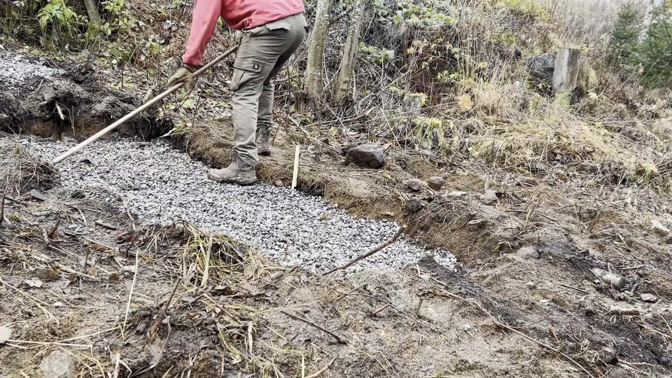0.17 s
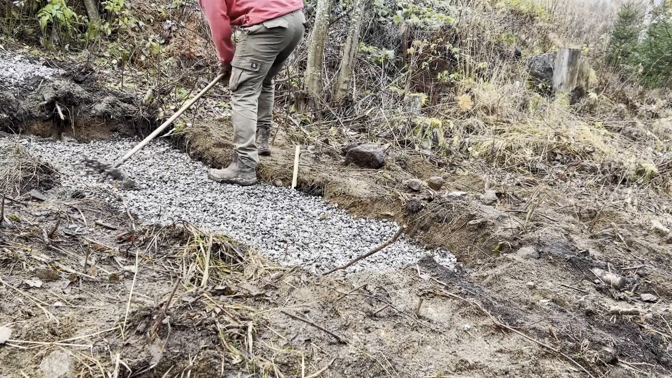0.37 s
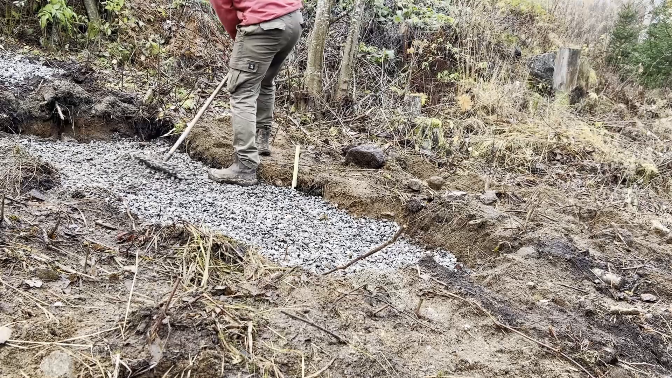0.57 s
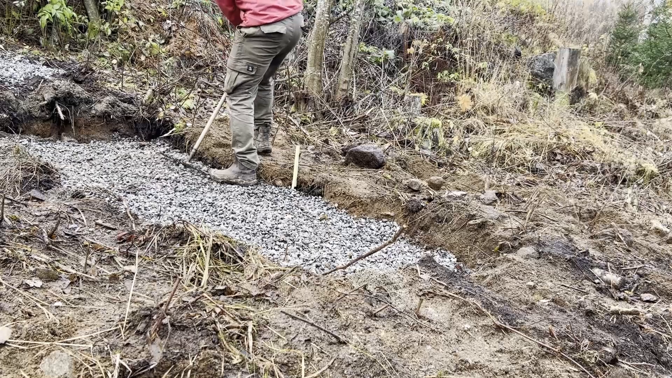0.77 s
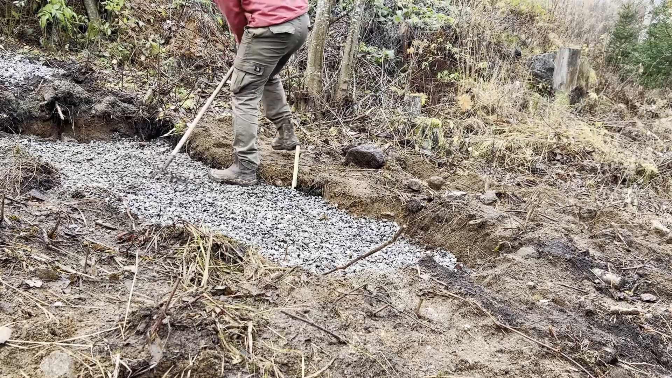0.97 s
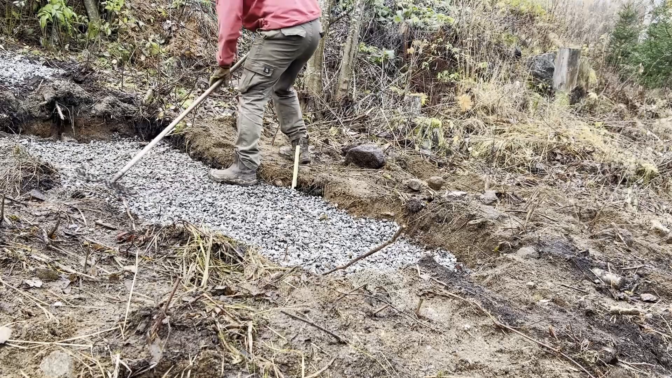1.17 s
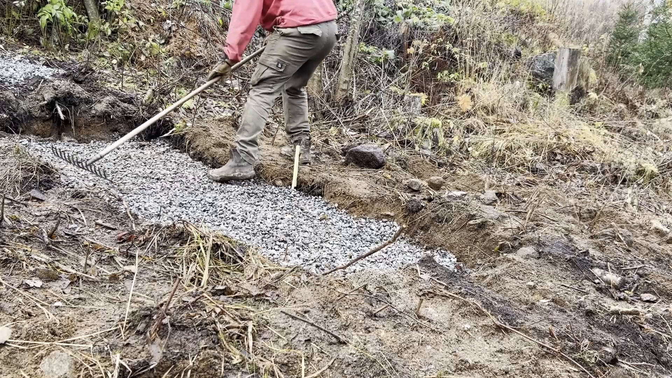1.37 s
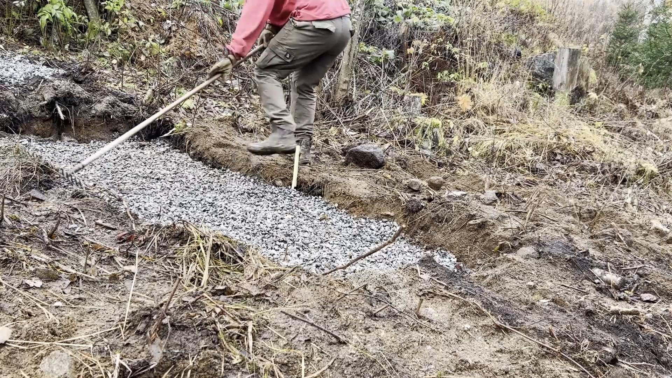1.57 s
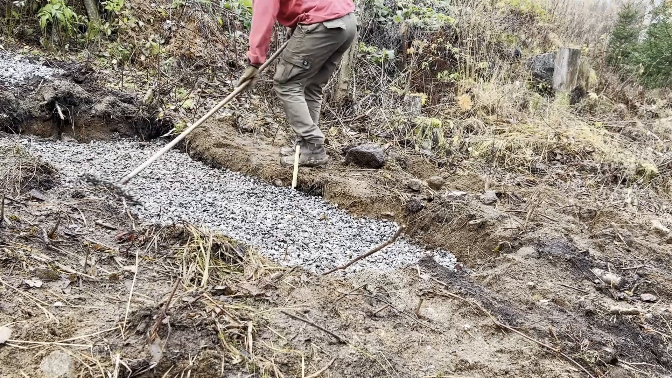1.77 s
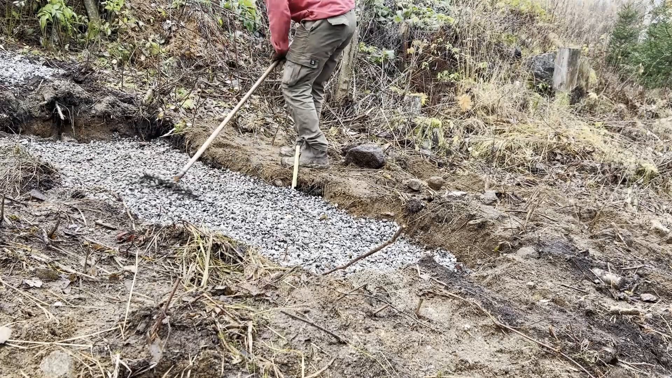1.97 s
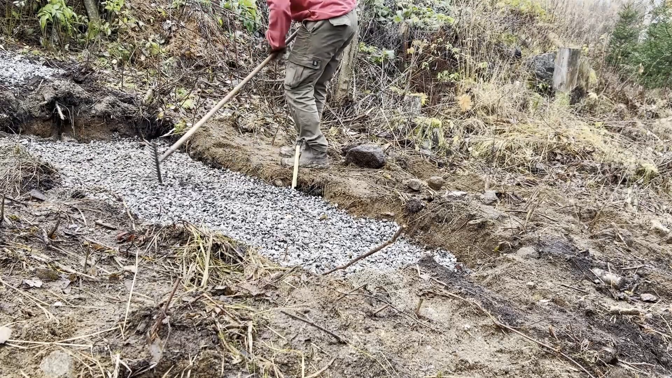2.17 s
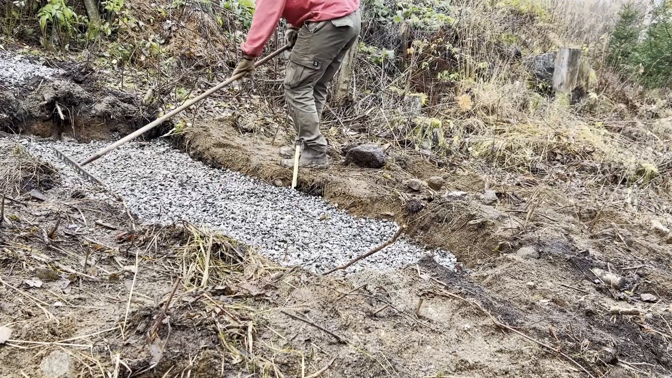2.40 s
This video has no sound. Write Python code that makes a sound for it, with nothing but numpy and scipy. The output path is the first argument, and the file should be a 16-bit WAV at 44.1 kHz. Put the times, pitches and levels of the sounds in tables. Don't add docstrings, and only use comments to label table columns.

```python
import sys
import numpy as np
from scipy import signal
from scipy.fft import rfft, irfft, next_fast_len
from scipy.io import wavfile
from scipy.ndimage import map_coordinates

SR = 44100
rng = np.random.default_rng(int(sys.argv[2]) if len(sys.argv) > 2 else 0)


def generate_wav(sig):
    pcm = np.round(np.clip(np.atleast_2d(sig).T, -1, 1) * 32767).astype(np.int16)
    wavfile.write(sys.argv[1], SR, pcm)


def natural_amplitude(level_db):
    exponent = np.asarray(level_db, float) / 20
    return 10 ** exponent


N = 108045

# (frequency [Hz], level [dB])
STONE_SPECTRUM = [(600, -18.5), (2000, -13.5), (4500, -9.5), (6200, -3), (8200, 2.5), (12000, -1),
                  (14500, 0.5), (15700, -2.5)]
# (frequency [Hz], bandwidth [Hz], level [dB])
TINE_MODES = [(1023, 72, 0), (1378, 94, -4.5), (1660.6, 28.4, 4.5), (1939, 167, 0.5), (2520, 71, 4.5),
              (2750, 12, 5), (2890, 38, 4.5), (3268, 41, 2.5), (3594, 89, 1), (4100, 155, -4),
              (5000, 530, -18), (2400, 1800, -12.5)]


def unit(x):
    return x / np.sqrt(np.mean(x ** 2) + 1e-20)


def along(points, hz):
    f, v = np.transpose(points)
    return np.interp(np.log(hz + 1), np.log(f + 1), v)


def curves(rows):
    s, *cols = np.transpose(rows)
    return [np.interp(np.arange(N) / SR, s, c) for c in cols]


def wobble(rate):
    return map_coordinates(rng.standard_normal(1000), [np.arange(N) * rate / SR])


def filtered(x, response):
    m = next_fast_len(N + SR // 2)
    return irfft(rfft(x, m) * response(np.fft.rfftfreq(m, 1 / SR)), m)[..., :N]


def coloured(x, spectrum):
    return unit(filtered(x, lambda hz: natural_amplitude(along(spectrum, hz))))


def resonance(f, centre, width, db):
    return natural_amplitude(db) * 1j * f * width / (centre * centre - f * f + 1j * f * width)


def bursts(events, rise_s, t60):
    out = np.zeros(N + SR)
    t = np.arange(SR // 4) / SR
    for s, db in events:
        out[round(s * SR):][:len(t)] += natural_amplitude(db - 60 * t / t60) * (1 - np.exp(-t / rise_s))
    return out[:N]


def scattered(grains):
    count, length = grains.shape
    at = (rng.random((count, 1)) * N).astype(int) + np.arange(length)
    return unit(np.bincount(at.ravel(), grains.ravel(), N + length)[:N])


def ports(x, alike):
    # (frequency [Hz], phase [rad])
    lead_points = [(0, 0), (1550, 1.05), (2350, 0), (4800, 0), (5400, 1.9), (6500, 2.15), (9600, 6.28),
                   (15800, 12.5)]
    # (frequency [Hz], level [dB])
    tilt_points = [(300, -1), (1000, 2), (1900, 4), (2500, -2), (4600, -3.5), (5000, 0), (5700, -5),
                   (7900, 0)]
    z = signal.stft(x, nperseg=128)[2]
    z = z * np.exp(2j * np.pi * rng.random(z.shape))
    other = np.sqrt(2) * signal.istft(z, nperseg=128)[1][:N]
    side = np.array([[1], [-1]])

    def turn(hz):
        return np.arccos(np.clip(along(alike, hz), 0, 1)) / 2

    def port(hz):
        lead = np.interp(hz, *np.transpose(lead_points))
        return natural_amplitude(side * along(tilt_points, hz) / 2) * np.exp(.5j * side * lead)

    first, second = (x, other) if x.ndim == 1 else x
    shared = filtered(first, lambda hz: port(hz) * np.cos(turn(hz)))
    diffuse = filtered(second, lambda hz: side * port(hz) * np.sin(turn(hz)))
    return shared + diffuse


def outdoor_air():
    # (frequency [Hz], level [dB])
    air_spectrum = [(18, -46.5), (30, -14.5), (382, -19), (596, -12.5), (698, -16.5), (883, -18),
                    (15800, -46.5)]
    return natural_amplitude(-67) * coloured(rng.standard_normal((2, N)), air_spectrum)


def ground():
    # (time [s], rumble level [dB], rustle over rumble [dB])
    load = [(0.0, -77, 7.5), (0.2, -56, 2), (0.25, -54, -9), (0.94, -65.5, 2), (1.14, -52.5, -7.5),
            (1.31, -71, 3), (1.62, -72.5, 2.5), (1.7, -51.5, -5), (1.83, -63, -4), (1.9, -49, -7.5),
            (2.09, -71, 0.5), (2.45, -68, -1.5)]
    # (frequency [Hz], level [dB])
    soil_spectrum = [(120, -19), (220, 4), (450, 2), (750, -3), (1200, -40), (2500, -48)]
    # (frequency [Hz], level [dB])
    rumble_spectrum = [(22, -50), (38, -17), (54, -1), (90, -8.5), (150, -11.5), (250, -34.5)]
    low_db, soil_db = curves(load)
    soil_lumps_db, low_lumps_db = 2 * wobble(30), 2 * wobble(18)
    soil = coloured(rng.standard_normal((2, N)), soil_spectrum)
    low = coloured(rng.standard_normal((2, N)), rumble_spectrum)
    return natural_amplitude(low_db + soil_db + 0.5 + soil_lumps_db) * soil + natural_amplitude(low_db - 1.0 + low_lumps_db) * low


def shower(count, spread_db, life_s):
    g = rng.random((count, 2))
    t = np.arange(160) / SR
    size_db = spread_db * np.minimum(-np.log(1 - g[:, :1]), 3)
    decay_s = life_s * (.3 + g[:, 1:])
    return scattered(natural_amplitude(size_db - 60 * t / decay_s) * rng.standard_normal((count, len(t))))


def clinks(count, middle_hz, octaves, life_s):
    g = rng.standard_normal((count, 3))
    t = np.arange(700) / SR
    hz = np.clip(middle_hz * 2 ** (octaves * g[:, :1]), 900, 15600)
    decay_s = life_s * np.exp(.4 * g[:, 2:])
    return scattered(natural_amplitude(2.5 * g[:, 1:2] - 60 * t / decay_s) * np.sin(2 * np.pi * hz * t))


def scraping(x):
    swap_db, buried = 3.5, 1.7
    centre, width, db = np.transpose(TINE_MODES)[..., None]
    width = np.where(width < 1000, buried * width, width)
    modes = filtered(x, lambda f: resonance(f, centre, width, db))
    touch_db = swap_db * np.array([wobble(26) for _ in TINE_MODES]) * (width < 1000)
    sign = (-1) ** np.arange(len(TINE_MODES))[:, None]
    return unit(np.sum(modes * natural_amplitude(touch_db) * sign, axis=0))


def gravel():
    # (time [s], stone shower level [dB], tine contact over the shower [dB])
    settle = [(0, -61.5, -28), (.06, -72.5, -3), (.07, -53.5, -8.5), (.176, -68, 2), (.185, -63, -15)]
    pull = [(.186, -59.5, 4), (0.199, -41.5, 5), (.222, -50.5, 3), (.28, -42, -5), (.44, -37, -11),
            (.6, -42, -11.5), (.74, -49, -14.5), (.88, -53, -3)]
    push = [(0.88, -56.5, -2), (0.903, -43, -12), (1.0, -35, -12.5), (1.045, -39.5, -5.5),
            (1.052, -41.5, -5), (1.06, -43.5, -1), (1.081, -49, -5)]
    rebound = [(1.085, -39, -10.5), (1.097, -31, -7), (1.126, -35.5, -8), (1.22, -46, -4.5),
               (1.28, -56.5, -3), (1.35, -54.5, -11.5), (1.561, -78.5, 4.5), (1.655, -95, -0.5)]
    second_pull = [(1.659, -92, -13.5), (1.666, -33, -3.5), (1.69, -48, 0), (1.77, -39, -5),
                   (1.88, -40, -10), (1.948, -39, -4.5), (2.06, -42.5, -18.5), (2.2, -51.5, -24),
                   (2.45, -81, 6)]
    # (time [s], swell [dB], half length [s])
    surges = [(0.279, 3.5, 0.0069), (0.295, 3, 0.0036), (.342, 4, 0.0061), (0.358, 1.5, .004),
              (0.373, 8, 0.0093), (0.434, 2.5, 0.0072), (0.445, 0.5, 0.0043), (0.45, 1, 0.0043),
              (.505, 2.5, 0.011), (0.521, 2.5, 0.0059), (0.549, 5, 0.0054), (0.668, 5.5, 0.0071),
              (0.947, 0, 0.0043), (1.137, -1.5, .005), (1.153, 1, .006), (1.18, 2.5, 0.0088),
              (1.224, 2.5, 0.007), (1.746, 2.5, 0.011), (1.808, -0.5, 0.0039), (1.864, 4, 0.013),
              (1.895, 1, 0.0072), (1.93, 3.5, 0.023), (1.956, 3, 0.012)]
    flow_db, dig_db = curves(np.vstack([settle, pull, push, rebound, second_pull]))
    t = np.arange(N) / SR
    jolt_db = .4 * wobble(34) + .7 * wobble(75)
    for s, db, half_s in surges:
        jolt_db = jolt_db + db * np.exp(-((t - s) / half_s) ** 2)

    cracks = shower(count=9000, spread_db=6.0, life_s=0.0011)
    hiss = natural_amplitude(3.5) * rng.standard_normal(N)
    grit = coloured(cracks + hiss, STONE_SPECTRUM)
    grit = grit + natural_amplitude(-12.5) * clinks(count=5000, middle_hz=10040, octaves=.45, life_s=0.011)
    sharp_db = 0.33 * (flow_db + 35)
    fine = filtered(grit, lambda hz: 1 / (1 + (12000 / (hz + 1)) ** 8))
    stones = natural_amplitude(flow_db + 6 + jolt_db) * (grit + (natural_amplitude(sharp_db) - 1) * fine)

    scrape = scraping(shower(count=4000, spread_db=2.0, life_s=0.0016))
    return stones + natural_amplitude(flow_db + dig_db - 1 + 0.66 * jolt_db) * scrape


def loose_stones():
    # (time [s], peak level
    # [dB])
    tick_times = [(.902, -30), (1.0478, -12), (1.0495, -16), (1.051, -19), (1.0535, -25), (1.0578, -26),
                  (1.0895, -19), (1.0925, -21), (1.1012, -14), (1.1032, -15), (1.1228, -20), (1.41, -48),
                  (1.444, -43), (1.53, -50), (.605, -27), (.714, -32), (2.0005, -27), (2.025, -27),
                  (2.0388, -22), (2.061, -27), (2.0855, -27), (2.1095, -23), (2.1165, -25), (2.132, -30),
                  (2.144, -30), (2.1595, -23), (2.167, -30), (2.176, -30), (2.188, -33), (2.22, -25),
                  (2.238, -42), (2.255, -38), (2.267, -40), (2.28, -42), (2.2905, -32), (2.30, -33),
                  (2.329, -46), (2.338, -44), (2.36, -44), (2.388, -54)]
    # (time [s], peak level [dB], frequency [Hz])
    knock_times = [(.069, -49.5, 484), (.131, -45, 420), (0.139, -48, 550), (.18, -50, 527),
                   (.186, -55, 263), (.382, -43, 310), (.44, -43.5, 255), (0.498, -45, 426),
                   (.551, -47.5, 428), (.659, -49.5, 592), (.717, -55, 425), (0.759, -39, 220),
                   (.777, -44, 480), (1.101, -37, 242), (1.112, -42.5, 634), (1.279, -43.5, 610),
                   (1.305, -53.5, 900), (1.319, -45, 600), (1.34, -53, 670), (1.36, -56, 650),
                   (1.372, -57, 670)]
    tick_spectrum = [(2500, -27), (5000, -14), (8000, 6), (14000, 1.5)]  # (Hz, dB)
    soft_spectrum = [(130, -8), (250, 0.5), (700, 2.5), (1200, -9.5), (2500, -19)]  # (Hz, dB)
    blow = np.sign(rng.standard_normal(N)) * bursts(tick_times, rise_s=.00005, t60=.004)
    ticks = filtered(blow, lambda hz: natural_amplitude(along(tick_spectrum, hz)))

    t = np.arange(N) / SR
    hollow = np.zeros(N)
    for s, db, hz in knock_times:
        hollow += bursts([(s, db)], rise_s=.001, t60=.028) * np.sin(2 * np.pi * hz * (t - s))
    soft = bursts([k[:2] for k in knock_times], rise_s=0.00066, t60=0.048)
    soft = soft * coloured(rng.standard_normal(N), soft_spectrum)
    return natural_amplitude(-1) * ticks + natural_amplitude(1) * (hollow + natural_amplitude(-4) * soft)


def pings():
    # (time [s], peak level [dB], frequency [Hz], t60 [s])
    struck = [(0.199, -30, 2950, 0.039), (.2, -30, 3227, 0.036), (.272, -41, 3540, 0.068),
              (.286, -41, 2500, 0.064), (.292, -43, 2850, 0.11), (.325, -45, 4650, .15),
              (.374, -34, 4630, .06), (.376, -49, 2505, .06), (.549, -49, 4540, 0.066),
              (0.654, -46.5, 3270, 0.1), (.955, -42, 2477, .08), (1.103, -38, 2520, 0.12),
              (1.108, -41, 1987, .15), (1.15, -38.5, 2540, 0.066), (1.17, -40, 2750, 0.1),
              (1.186, -47.5, 2050, 0.18), (1.24, -48.5, 2507, 0.19), (1.238, -42.5, 1980, 0.083),
              (1.247, -55.5, 3760, .2), (1.285, -58, 2730, 0.15), (1.668, -36.5, 1990, .1),
              (1.673, -39.5, 2567, 0.14), (1.739, -35, 2550, .05), (1.803, -41, 2497, 0.12),
              (1.909, -37, 3300, 0.098), (1.953, -42.5, 3546, 0.15)]
    t = np.arange(N) / SR
    out = np.zeros(N)
    for s, db, hz, t60 in struck:
        out += bursts([(s, db)], rise_s=0.0017, t60=t60) * np.sin(2 * np.pi * hz * t)
    return out


def steel(x):
    def head(f):
        return sum((-1) ** k * resonance(f, *mode) for k, mode in enumerate(TINE_MODES))

    return filtered(x, head)


def thud():
    start_hz, end_hz, sag_s = 120, 50, .016
    t = np.arange(SR // 3) / SR
    cycles = end_hz * t + (start_hz - end_hz) * sag_s * (1 - np.exp(-t / sag_s))
    wave = natural_amplitude(-60 * t / .26) * np.sin(2 * np.pi * cycles)
    shaft = natural_amplitude(2 - 60 * t / 0.061) * np.sin(2 * np.pi * 219 * t)
    return (1 - np.exp(-t / 0.0042)) * (wave + shaft)


def blows():
    # (time [s], crack level [dB], ring over crack [dB], thud over crack [dB], loudest ring [Hz])
    landings = [
        (0.2002, -25, -15, -21.5, 3080),
        (0.3693, -28, -5, -37, 4630),
        (0.451, -28, -3.5, -25.5, 2010),
        (0.758, -26.5, -13.5, -49, 3950),
        (1.1006, -25.5, -12, -25, 2570),
        (1.6669, -23.5, -10, -22, 2010),
        (1.9439, -24.5, -14, -29.5, 3450),
    ]
    s, db = np.transpose(landings)[:2]
    crack = coloured(shower(count=7000, spread_db=10.0, life_s=0.004), STONE_SPECTRUM)
    out = np.zeros(N + SR)
    out[:N] = bursts(zip(s, db - 5), rise_s=0.00067, t60=0.071) * crack
    head, soil = unit(steel(rng.standard_normal(N))), thud()
    for at, level, ring_db, thud_db, hz in landings:
        ring = unit(filtered(head, lambda f: 0.28 + 1 / (1 + ((f - hz) / 250) ** 2)))
        out[:N] += bursts([(at, level + ring_db - 6)], rise_s=0.0016, t60=0.066) * ring
        out[round((at + .004) * SR):][:len(soil)] += natural_amplitude(level + thud_db + 8.5) * soil
    return out[:N]


def scene():
    # (frequency [Hz], likeness [0..1])
    near_alike = [(60, .97), (150, .9), (600, .72), (2400, .87), (4300, .72), (5100, .4), (5900, .74),
                  (9000, .85)]
    # (frequency [Hz], likeness [0..1])
    air_alike = [(60, 0.8), (200, 0.17), (600, 0.033), (9000, 0.24)]
    rake = gravel() + blows() + pings() + loose_stones()
    return ports(rake, near_alike) + ports(ground(), near_alike) + ports(outdoor_air(), air_alike)


def roll_off(x):
    return signal.sosfilt(signal.butter(12, 16810, fs=SR, output="sos"), x)


def record(dry):
    x = filtered(dry, lambda hz: 1 / (1 + (hz / 15850) ** 120))
    mid_side = np.array([x[0] + x[1], x[0] - x[1]]) / 2
    hz, _, z = signal.stft(mid_side, SR, nperseg=2048)
    power = np.abs(z[:, :-1]).reshape(2, 64, 16, -1) ** 2
    power = np.repeat(power.mean(axis=2), 16, axis=1)
    power = np.pad(power, ((0, 0), (0, 1), (0, 0)))
    mask_db = -10
    keep = (power > power[::-1] * natural_amplitude(2 * mask_db)) | (hz < 2100)[:, None]
    mid, side = signal.istft(z * keep, SR, nperseg=2048)[1][:, :N]
    return roll_off(np.array([mid + side, mid - side]))


dry = scene()
out = record(dry)
generate_wav(out)
```